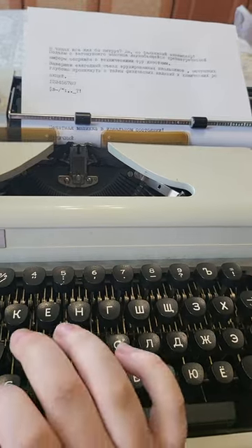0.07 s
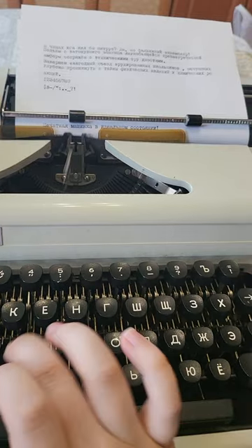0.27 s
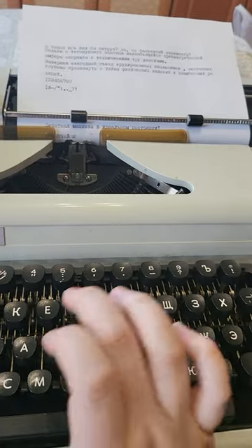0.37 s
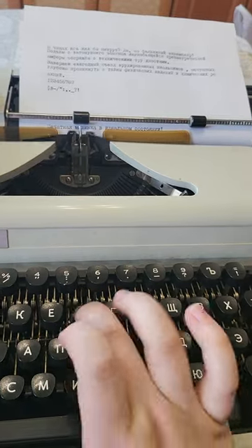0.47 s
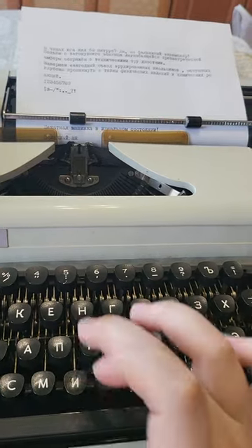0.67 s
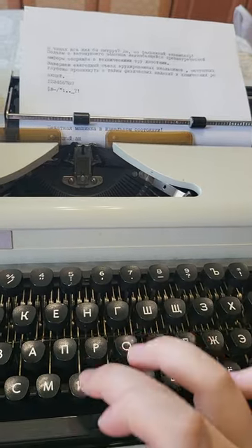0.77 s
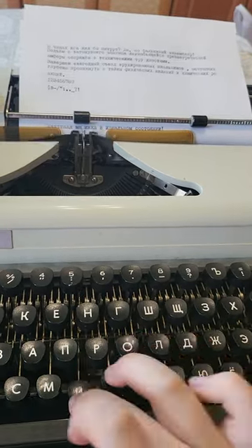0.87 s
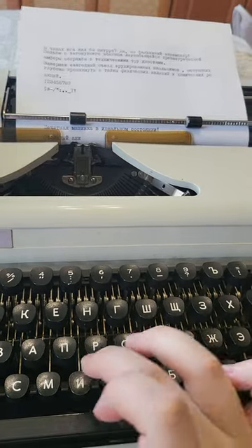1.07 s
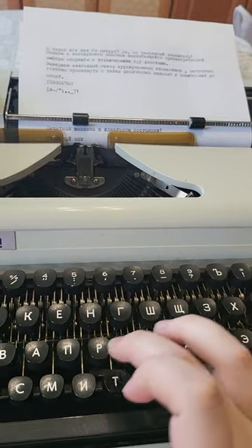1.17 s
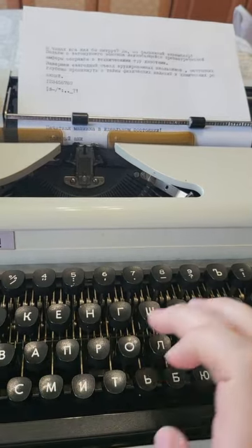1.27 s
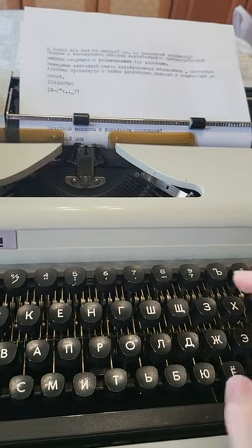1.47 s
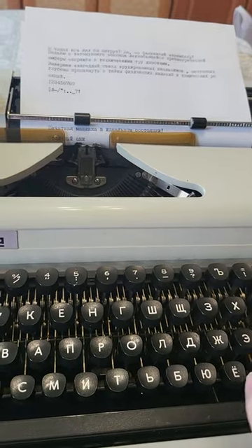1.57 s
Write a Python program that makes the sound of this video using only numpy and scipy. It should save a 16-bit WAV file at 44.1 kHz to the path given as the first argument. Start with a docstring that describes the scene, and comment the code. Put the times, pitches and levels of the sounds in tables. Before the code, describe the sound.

A manual typewriter types three sharp, clacking letters close by in a quiet room.

```python
"""A manual typewriter types three letters in a small quiet room, close to a stereo microphone.
Each key clicks as it takes up the linkage, the type bar swings up and slaps the platen, the
escapement ticks, and the bar drops back on its rest. The case thumps on the table, steel parts
ring, and the room answers over a low murmur of air."""
import sys
import numpy as np
from scipy import signal
from scipy.fft import rfft, irfft
from scipy.io import wavfile
from scipy.ndimage import uniform_filter1d

SR = 44100
rng = np.random.default_rng(int(sys.argv[2]) if len(sys.argv) > 2 else 0)


def master(y):
    """Save y as 16-bit WAV."""
    cut = np.clip(np.atleast_2d(y).T, -1, 1)
    pcm = np.round(cut * 32767)  # scale
    wavfile.write(sys.argv[1], SR, pcm.astype(np.int16))


N = 70560
SIZE = 32768  # samples in one event
T, HZ = np.arange(SIZE) / SR, np.fft.rfftfreq(SIZE, 1 / SR)
# machine and room as a strike sets them ringing (frequency [Hz], level [dB])
CLATTER_TONE = [(100, -20), (380, -12.5), (780, -17.5), (1050, -12), (1480, -4), (1700, -11.5), (2200, -1),
                (2750, -6), (3400, -5), (4100, -10.5), (5200, -11), (7100, -5.5), (8400, -21), (11500, -20),
                (12900, -8), (14200, -18.5), (15000, -13), (16000, -20.5)]


def amp(db):
    """Decibels to gain."""
    return 10 ** (np.asarray(db) / 20)


def read(points, hz=HZ):
    """A table joined by lines on a log-frequency axis."""
    f, value = np.transpose(points)
    return np.interp(np.log(hz + 1), np.log(f + 1), value)


def add(mix, s, sound):
    """Mixes a stereo sound in at s seconds."""
    part = mix[:, max(round(s * SR), 0):][:, :sound.shape[1]]
    part += sound[:, :part.shape[1]]


def unit(x):
    """Scales to the energy of one millisecond at full level."""
    return x / np.sqrt((x ** 2).sum() / 2 / (SR / 1000) + 1e-20)


def sides(difference):
    """Left and right offsets for a right-minus-left difference."""
    return np.array([[-.5], [.5]]) * difference


def colour(x, db):
    """Causal filter with the given gain curve."""
    cepstrum = irfft(np.log(amp(db)))
    cepstrum[..., 1:SIZE // 2] *= 2
    cepstrum[..., SIZE // 2 + 1:] = 0
    return irfft(rfft(x) * np.exp(rfft(cepstrum)))


def noise(same=0):
    """Stereo noise with a share common to both sides."""
    a, b = rng.standard_normal((2, SIZE))
    return np.array([a, same * a + np.sqrt(1 - same ** 2) * b])


def contact(tone_db, rise_s, fall_s, same=0):
    """A brief chatter of surfaces, even in spectrum, coloured by the part that is hit."""
    burst = noise(same) * (1 - np.exp(-T / rise_s)) * np.exp(-T / fall_s)
    flat = irfft(np.exp(1j * np.angle(rfft(burst))))
    chatter = flat * (1 - np.exp(-2 * T / rise_s)) * np.exp(-(T / (2 * np.pi * fall_s)) ** 2)
    return unit(colour(chatter / chatter.std(axis=1, keepdims=True), tone_db))


def ring(modes, rise_s, spread_rad, scatter=1):
    """Dying modes, shifted in phase either way for left and right; scatter 0 starts them in step."""
    phases = scatter * rng.uniform(0, 2 * np.pi, len(modes))
    apart = sides(2 * spread_rad)
    ringing = sum(amp(db) * np.exp(-np.log(1000) * T / t60) * np.sin(2 * np.pi * hz * T + phase + apart)
                  for (hz, db, t60), phase in zip(modes, phases))
    return (1 - np.exp(-T / rise_s)) * ringing


def room_air():
    """Steady low murmur of the room's air and a faint hiss."""
    # room tone (frequency [Hz], level [dB])
    air_tone = [(20, -14.5), (45, 0), (92, -7.5), (128, -23.5), (180, -3.5), (290, -14), (420, -5),
                (520, -13.5), (900, -17), (1270, -19.5), (1600, -26), (3500, -23), (5200, -35.5),
                (5800, -24.5), (6800, -26), (7850, -34.5), (8200, -60), (16000, -60.5)]
    # likeness of the air at left and right (frequency [Hz], correlation [0-1])
    likeness = [(40, 0.2), (200, 0.63), (500, 0.041), (8000, 0)]
    hz = np.fft.rfftfreq(N, 1 / SR)
    a, b = rfft(rng.standard_normal((2, N)))
    same = read(likeness, hz)
    spectrum = np.array([a, same * a + np.sqrt(1 - same ** 2) * b])
    air = irfft(spectrum * amp(read(air_tone, hz)), N)
    return amp(-60.5) * air / air.std()


def room_tail(tone_db, length=1.0):
    """Dense, uneven reflections with passing resonances, each band dying at its own speed."""
    # reverberation of the small room (frequency [Hz], T60 [s]); length scales the times
    room_t60 = [(100, 0.15), (300, 0.49), (700, .42), (1840, 0.39), (4850, 0.33), (8000, 0.31),
                (13000, 0.23)]
    flutter_db, resonance_db = 0.5, 2.5
    hz, t, bands = signal.stft(noise(), SR, nperseg=512)
    a, b = rng.standard_normal((2, *bands.shape[1:]))
    flutter, resonance = uniform_filter1d(a, size=10, axis=0), uniform_filter1d(b, size=8, axis=1)
    bands = bands * amp(flutter_db * flutter / flutter.std() + resonance_db * resonance / resonance.std())
    decay = np.exp(-np.log(1000) * t / (length * read(room_t60, hz)[:, None]))
    wash = signal.istft(bands * decay, SR)[1][:, :SIZE]
    onset = 1 - np.exp(-np.maximum(T - .007, 0) / 0.0042)  # the room answers after 7 ms
    early_lift = 1 + np.exp(-T / 0.014)
    return unit(colour(wash * onset * early_lift, tone_db))


def case_thumps():
    """The case knocks on the table and booms briefly; the heaviest blow jolts the table."""
    # keys and carriage knocking through the case (time [s], level [dB], decay [s], tilt [dB/octave])
    knocks = [(0.191, -25.5, 0.015, 5.5), (0.22, -20, 0.0075, 0.5), (0.249, -25.5, 0.021, -4.5),
              (.325, -30, 0.022, 8.5), (0.358, -25, 0.0074, 3), (.503, -33, 0.0094, 1),
              (.535, -25, 0.022, 0.5), (0.579, -28, 0.018, -5), (0.612, -29, 0.096, 2.5),
              (.668, -29, 0.012, 3), (0.72, -29, 0.021, 0.5), (.886, -34.5, 0.013, -3),
              (.912, -26.5, 0.013, -4), (0.942, -24, 0.033, 1), (.968, -27, 0.094, -1),
              (1.039, -27, 0.0057, 1)]
    # colour of a knock (frequency [Hz], level [dB])
    knock_tone = [(20, -11), (50, -3), (90, 1), (140, -10.5), (200, -11.5), (280, -20), (380, -10),
                  (600, -22), (1200, -24.5), (4000, -76.5)]
    # modes of the case on the table (frequency [Hz], level [dB], T60 [s])
    case_modes = [(86, -19.5, 0.14), (104, -23.5, .17), (142, -21, 0.36), (203.3, -27.5, 0.23),
                  (270, -29.5, 0.25), (345, -26, 0.2), (366.5, -23, 0.25)]
    out, tone = np.zeros((2, N)), read(knock_tone)
    octaves = np.log2(np.clip(HZ, 70, 700) / 150)
    for s, db, fall_s, tilt in knocks:
        # each knock loads the case differently and shifts its modes
        modes = [(hz * (1 + 0.028 * rng.uniform(-1.2, 1)), level, t60) for hz, level, t60 in case_modes]
        knock = contact(tone, rise_s=0.0032, fall_s=fall_s, same=0.41) + amp(-5.5) * room_tail(tone)
        boom = amp(1.5) * ring(modes, rise_s=0.0026, spread_rad=0.56)
        add(out, s, amp(db - 1) * unit(colour(knock + boom, tilt * octaves)))
    jolt_s, jolt_hz, jolt_db, jolt_t60 = .2225, 88, -32, .07
    add(out, jolt_s, ring([(jolt_hz, jolt_db, jolt_t60)], rise_s=0.0027, spread_rad=.5, scatter=0))
    return out


def bar_returns():
    """The bar lands on its padded rest with a dull clack; the basket rings and a spring twangs."""
    # bars falling back (time [s], level [dB], decay [s])
    landings = [(0.3780, -21, .0065), (0.6939, -24.5, 0.0044), (1.0819, -24, 0.0038)]
    # colour of the padded rest (frequency [Hz], level [dB])
    rest_tone = [(100, -13), (380, -6.5), (550, -4), (720, -4.5), (1250, -2), (1700, -6), (2700, -2),
                 (3800, -8.5), (5200, -12.5), (7300, -8), (8800, -24), (12000, -13.5), (16000, -27)]
    # modes of the basket of type bars (frequency [Hz], level [dB], T60 [s])
    basket_modes = [(667, -23, 0.16), (1038, -18.5, 0.1), (1262, -19, 0.11), (1735, -26.5, 0.12),
                    (2800, -30, .33)]
    # two close, beating modes of a return spring (frequency [Hz], level [dB], T60 [s])
    spring_modes = [(1956, 0, 0.23), (1976, -5, 0.23)]
    # twangs of that spring (time [s], level [dB])
    twangs = [(.719, -47), (1.107, -44)]
    out, tone = np.zeros((2, N)), read(rest_tone)
    for s, db, fall_s in landings:
        clack = contact(tone, rise_s=.003, fall_s=fall_s) + amp(-5.5) * room_tail(tone, length=0.75)
        basket = amp(3.5) * ring(basket_modes, rise_s=0.0032, spread_rad=0.23)
        add(out, s, amp(db) * (clack + basket))
    damping = np.exp(-np.maximum(T - .135, 0) / .008)  # the linkage settles and stops the spring
    for s, db in twangs:
        add(out, s, amp(db) * damping * ring(spring_modes, rise_s=0.0024, spread_rad=0.38, scatter=0))
    return out


def escapement_and_levers():
    """Bright catches of the escapement and the lighter clicks of the levers."""
    # escapement and ribbon lift catching around each strike (time [s], level [dB], decay [s])
    catches = [(0.2185, -25, 0.002), (0.2472, -25.5, 0.0017), (.2778, -30, 0.0017), (.5350, -22.5, 0.00088),
               (0.548, -19, 0.0012), (0.5623, -17, 0.00088), (0.9385, -23.5, 0.00091),
               (0.9525, -23.5, 0.0012), (0.9644, -21, 0.0011), (.9675, -16.5, .001)]
    # colour of a catch (frequency [Hz], level [dB])
    catch_tone = [(200, -31.5), (1500, -10), (3000, -9), (5000, -6.5), (7000, -7.5), (8700, -17),
                  (11000, -9.5), (13000, 3.5), (14300, -8.5), (16000, -11)]
    # key levers letting go (time [s], level [dB], decay [s])
    releases = [(.3722, -28.5, .0016), (.6889, -25.5, 0.002), (.6958, -32, 0.0034), (1.0798, -30.5, .0016),
                (1.0922, -34, 0.0021)]
    # colour of a release (frequency [Hz], level [dB])
    release_tone = [(300, -13.5), (2800, -9.5), (5000, -9), (7300, -1.5), (8800, -13), (9800, 1.5),
                    (11000, -9), (12300, -1.5), (16000, -9)]
    out = np.zeros((2, N))
    for events, tone in ((catches, read(catch_tone)), (releases, read(release_tone))):
        for s, db, fall_s in events:
            tick = contact(tone, rise_s=0.00078, fall_s=fall_s)
            add(out, s, amp(db) * (tick + amp(-8) * room_tail(tone)))
    return out


def key_presses():
    """Each key clicks as it takes up the linkage."""
    # keys going down (time [s], level [dB])
    presses = [(0.1871, -23.5), (0.4978, -28.5), (0.908, -26.5)]
    # colour of key and linkage (frequency [Hz], level [dB])
    press_tone = [(100, -8), (350, -3), (750, 4), (1100, -10.5), (1450, 3), (2300, -4.5), (3600, -1),
                  (5100, -8), (5800, 1), (7400, -1.5), (9500, -9), (13000, -7), (16000, -10)]
    out, tone = np.zeros((2, N)), read(press_tone)
    for s, db in presses:
        click = amp(-0.5) * contact(tone, rise_s=0.00087, fall_s=0.0065)
        soft_click = amp(-6) * contact(tone, rise_s=0.003, fall_s=0.0071)
        add(out, s, amp(db) * (click + soft_click + room_tail(tone)))
    return out


def bar_strikes():
    """The bar rattles up, slaps paper and platen and rebounds; the frame clangs, the room clatters."""
    # bars hitting the platen (time [s], level [dB], decay [s], right minus left [dB], clang [dB])
    strikes = [(0.2232, -5, 0.00089, -5, 0.5), (0.5387, -6.5, .0014, 6.5, 0.5),
               (0.9435, -6.5, 0.0014, -4.5, 3.5)]
    # the slap at the microphone's left port (frequency [Hz], level [dB])
    slap_left = [(100, -24), (650, -22), (950, -29), (1400, -8.5), (1800, -19), (2200, -12), (3600, -14),
                 (4300, -8), (5000, -21), (5600, -22), (7300, -6.5), (8400, -29), (10800, -28),
                 (12800, -12.5), (14000, -27), (15200, -21), (16000, -32)]
    # the slap at its right port (frequency [Hz], level [dB])
    slap_right = [(100, -23), (650, -19), (950, -27), (1400, -6), (1800, -13), (2550, 1), (3000, -8),
                  (3550, -17), (4200, -6), (5000, -22), (6300, -14), (6900, -1.5), (7500, -10), (8400, -26),
                  (10800, -29), (12000, -20), (12900, -7.5), (14200, -27), (15300, -17), (16000, -29)]
    # build-up of the slap, left then right; the right port is further from the platen (rise [s])
    slap_rise = [
        [.0006],
        [0.0014],
    ]
    # where the clatter sits in the stereo image (frequency [Hz], right minus left [dB])
    clatter_balance = [(400, 2.5), (900, 0), (1400, -1.5), (2100, 9), (2800, 1), (7000, 0), (14000, -0.5)]
    # modes of the frame's steel parts (frequency [Hz], level [dB], T60 [s])
    frame_modes = [(1297, -60, 2.5), (1463, -33, 0.14), (1508, -37, 0.25), (2035, -27, 0.16),
                   (2121, -32, 0.22), (2165, -31, 0.26), (2257, -28, 0.22), (2317, -31, 0.25),
                   (2470, -32.5, .25), (3190, -39, .25), (3379, -38, 0.22), (4307, -37, .17),
                   (6834, -37, .15), (12750, -37, .11), (12968, -34, 0.11)]
    out, lead_s = np.zeros((2, N)), .1
    for s, *_ in strikes:  # the rattle of the rising bar grows up to the blow
        swing = noise() * np.exp(-abs(T - lead_s) / 0.004) * (T < lead_s)
        add(out, s - lead_s, amp(-20) * unit(colour(swing, read(CLATTER_TONE))))
    clatter = read(CLATTER_TONE) + sides(read(clatter_balance))
    common_tail, share = room_tail(clatter), 0.52  # this share of the clatter is alike in every strike
    clang_delay_s, bounce_delay_s = .007, .0098
    for s, db, fall_s, right_db, clang_db in strikes:
        tone = np.array([read(slap_left), read(slap_right)]) + sides(right_db)
        slap = contact(tone, rise_s=np.array(slap_rise), fall_s=fall_s)
        shake = amp(-14) * contact(clatter, rise_s=0.0022, fall_s=0.0033)
        room = np.sqrt(share) * common_tail + np.sqrt(1 - share) * room_tail(clatter)
        add(out, s, amp(db) * (slap + shake + amp(-2) * room))
        clang = ring(frame_modes, rise_s=0.003, spread_rad=0.39)
        add(out, s + clang_delay_s, amp(db + clang_db + sides(0.5)) * clang)
        bounce = contact(tone, rise_s=0.00033, fall_s=0.0027)
        add(out, s + bounce_delay_s, amp(db - 17) * bounce)
    return out


def scene():
    """The typewriter, close up on its table in the quiet room."""
    typing = key_presses() + bar_strikes() + escapement_and_levers() + bar_returns()
    return typing + case_thumps() + room_air()


def record(dry):
    """Two spaced microphone ports widen the middle; the recorder rounds peaks and cuts the top treble."""
    # how wide the ports hear the machine (frequency [Hz], side minus mid [dB])
    stereo_width = [(60, -6.5), (200, -14), (400, -1), (700, 5.5), (1300, 2.5), (2400, 0.5), (8000, 0.5),
                    (14000, -1)]
    ceiling, edge_hz = .9, 15900
    left, right = rfft(dry)
    width = amp(read(stereo_width, np.fft.rfftfreq(N, 1 / SR)))
    mid, side = (left + right) / 2, width * (left - right) / 2
    heard = irfft(np.array([mid + side, mid - side]) / np.sqrt((1 + width ** 2) / 2), N)
    rounded = heard / (1 + (heard / ceiling) ** 6) ** (1 / 6)
    lowpass = signal.firwin(255, edge_hz, window=("kaiser", 8), fs=SR)
    return signal.oaconvolve(rounded, lowpass[None], "same")


dry = scene()
out = record(dry)
master(out)
```